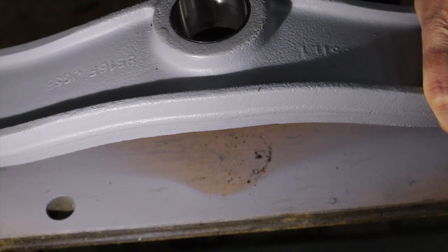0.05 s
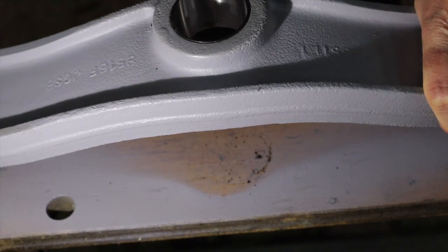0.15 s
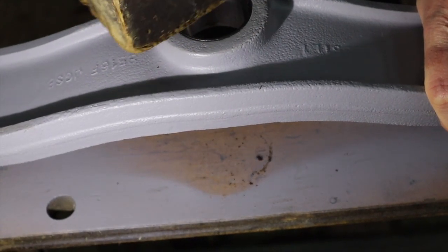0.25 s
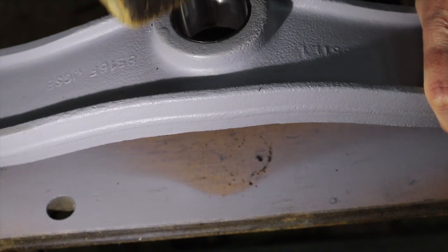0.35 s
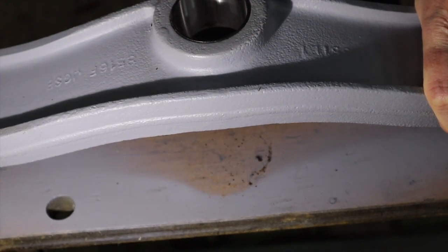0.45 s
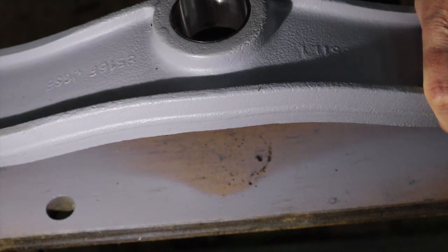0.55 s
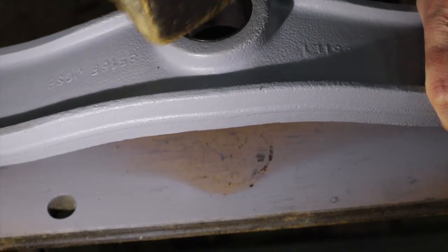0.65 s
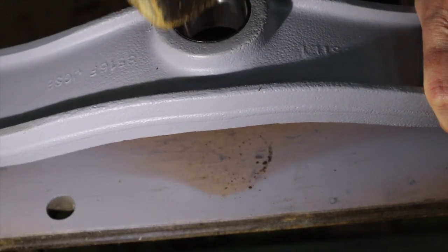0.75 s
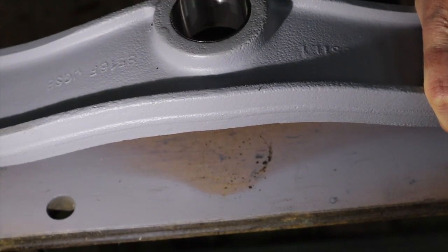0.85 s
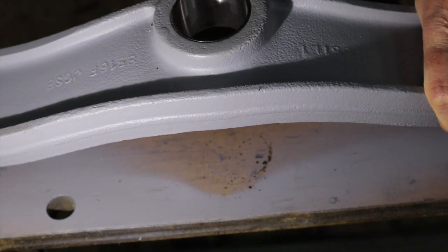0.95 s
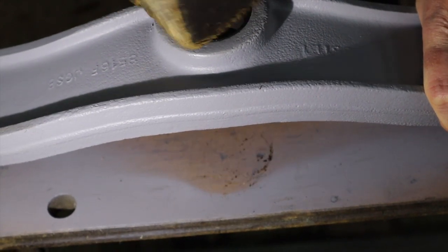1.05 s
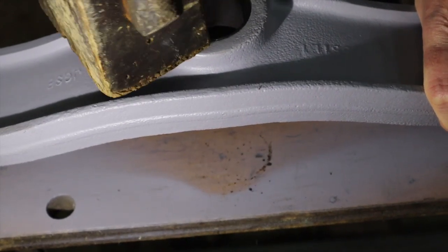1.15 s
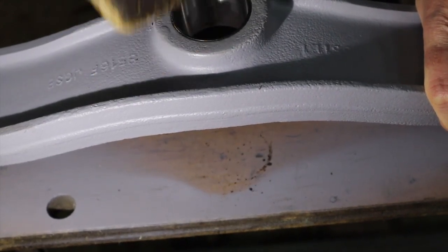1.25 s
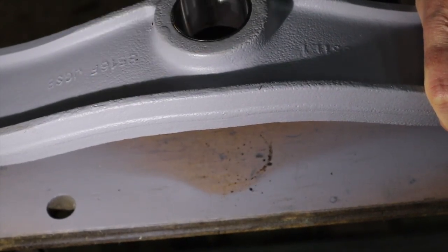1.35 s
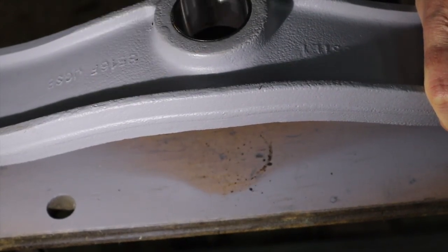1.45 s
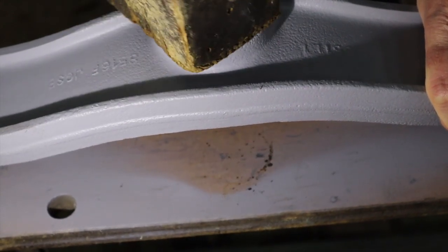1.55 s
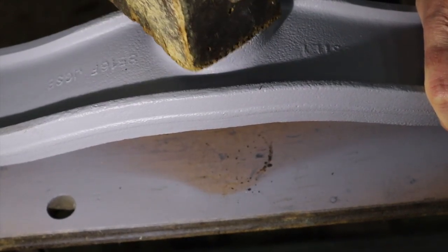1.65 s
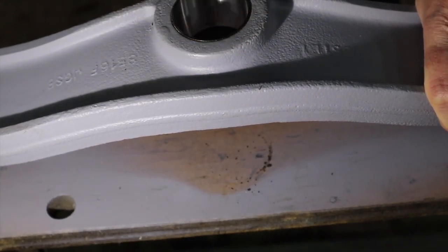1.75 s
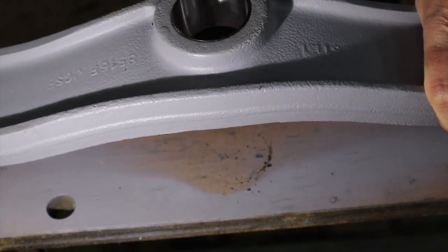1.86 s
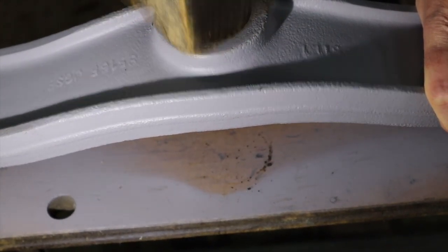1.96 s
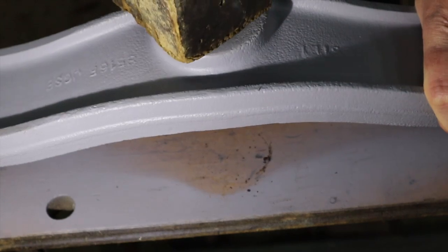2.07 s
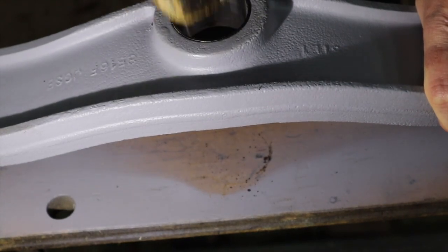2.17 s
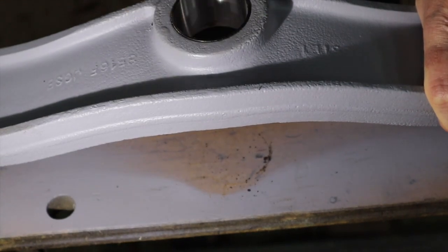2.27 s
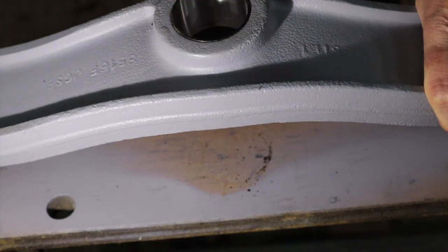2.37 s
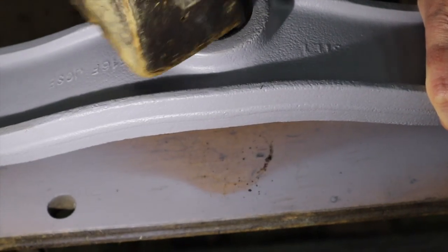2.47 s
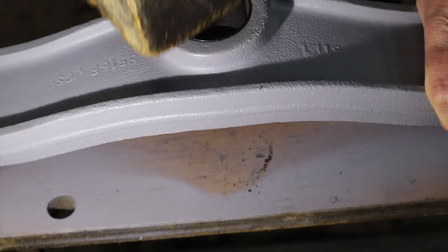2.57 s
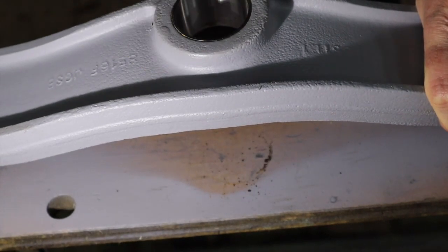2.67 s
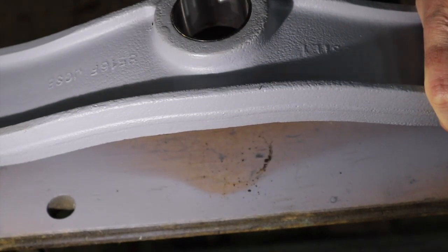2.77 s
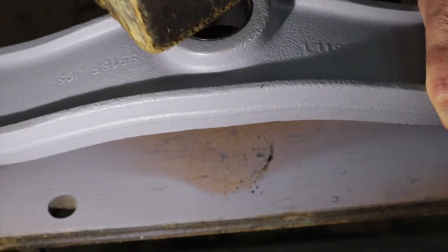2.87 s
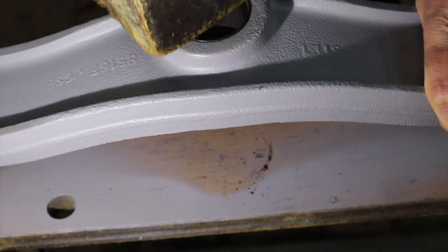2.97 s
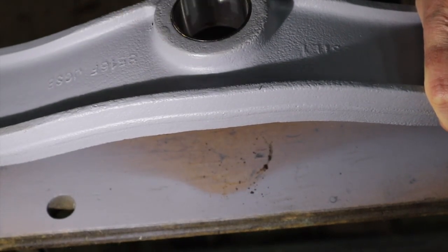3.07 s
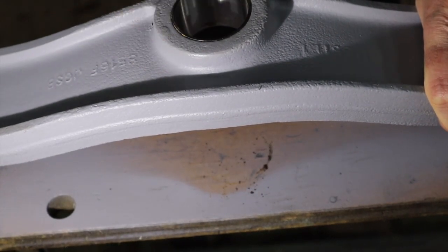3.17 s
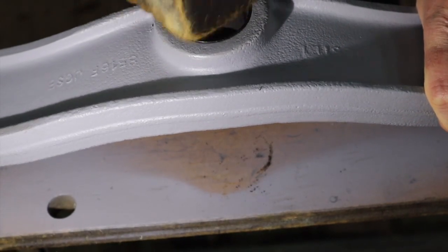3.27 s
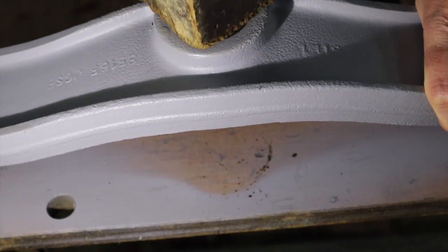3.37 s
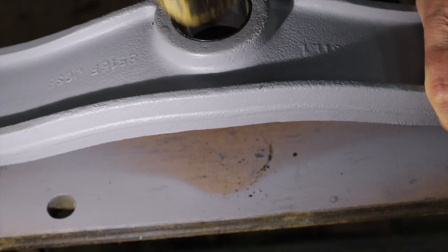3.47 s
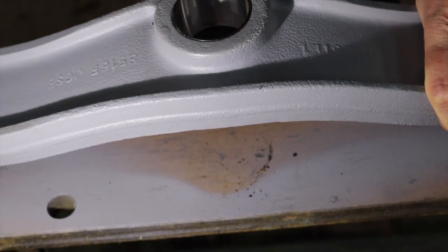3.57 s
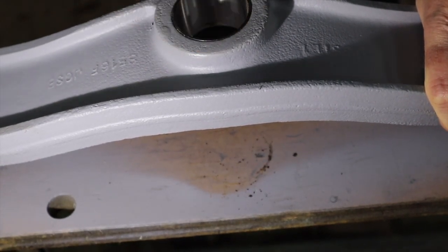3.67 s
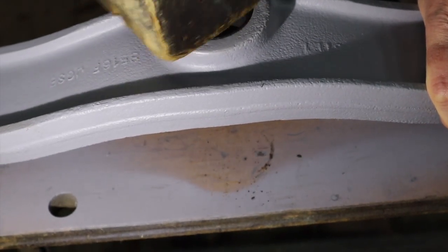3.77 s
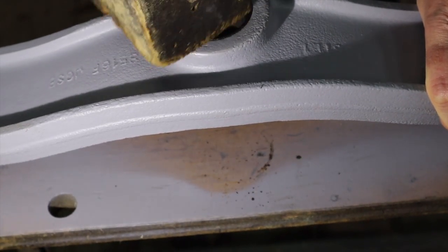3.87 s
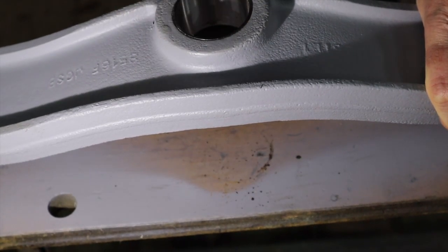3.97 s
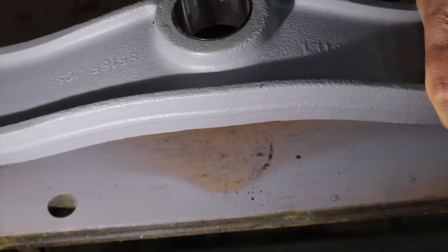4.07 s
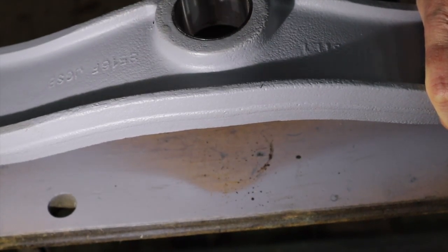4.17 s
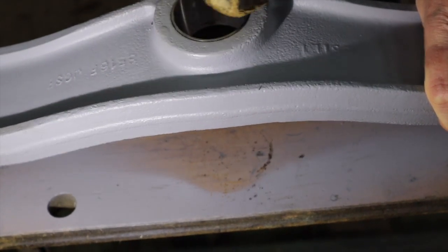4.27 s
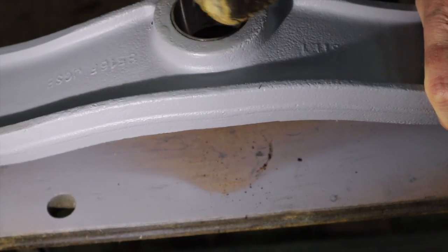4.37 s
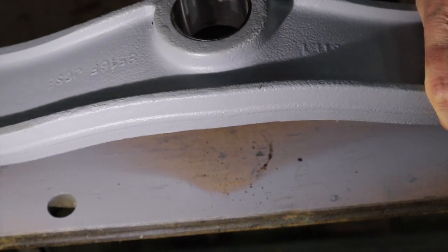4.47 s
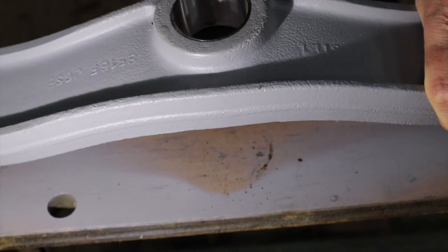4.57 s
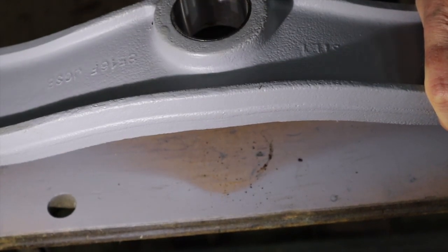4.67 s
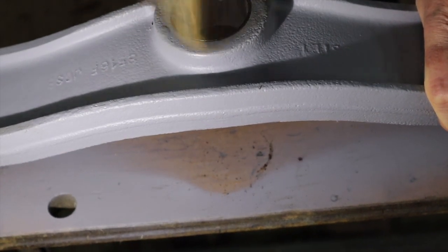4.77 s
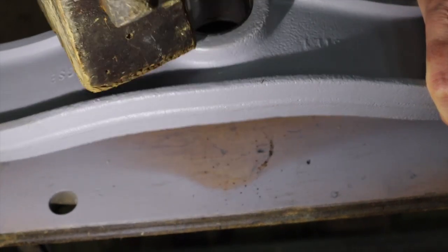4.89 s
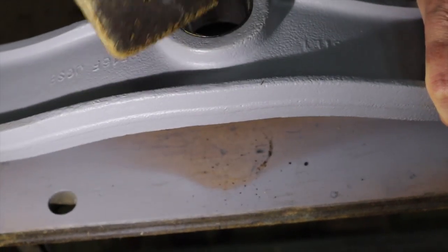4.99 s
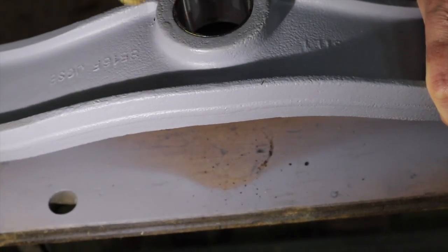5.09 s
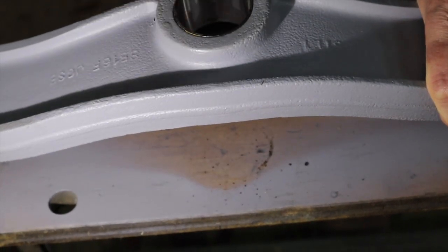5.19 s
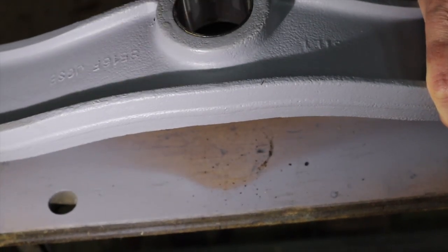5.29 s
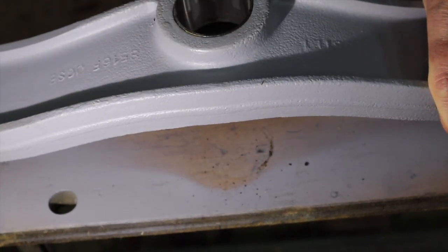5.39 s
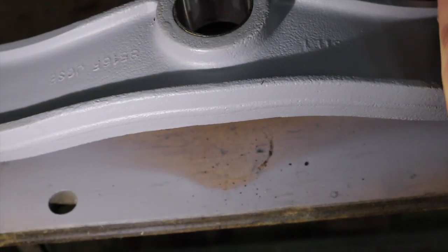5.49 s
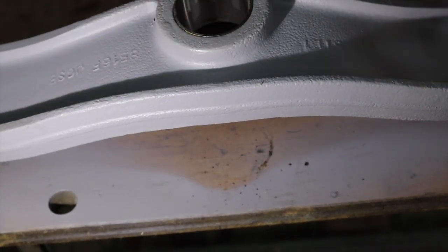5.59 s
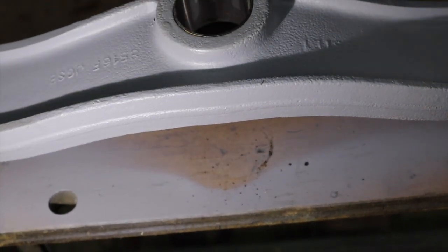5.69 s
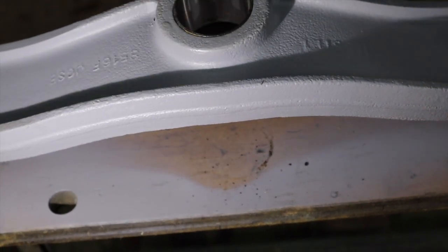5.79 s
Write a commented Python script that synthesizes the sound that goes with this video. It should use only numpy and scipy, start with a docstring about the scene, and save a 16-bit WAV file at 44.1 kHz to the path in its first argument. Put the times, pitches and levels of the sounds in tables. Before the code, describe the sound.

A hammer taps a steel bush into a cast metal beam, eleven blows at about two a second. Each lands with a sharp crack, a slight thump from the bench and a bright metallic ring that changes in colour from hit to hit. The last blow comes slightly late and harder, then rings away over a faint low rumble. The microphone is close and slightly overloaded, with a short workshop echo.

```python
"""Sharp, ringing blows, about two a second: a hammer taps a steel bush into a cast axle beam.
Each impact cracks, thumps the bench and excites the casting's modes, whose strengths depend on where
round the rim it lands; the workshop walls give back a short wash. Near the end the beam hops on the
bench and a faint rumble grows. The close microphone overloads lopsidedly, and a gain control ducks
after each blow."""
import sys
import numpy as np
from scipy import signal
from scipy.io import wavfile
from scipy.ndimage import minimum_filter1d

SR = 44100
rng = np.random.default_rng(int(sys.argv[2]) if len(sys.argv) > 2 else 0)


def store_wav(level_fs):
    """Save 16-bit WAV to argv[1]."""
    pcm = np.round(np.clip(np.atleast_2d(level_fs), -1, 1) * 32767)
    wavfile.write(sys.argv[1], SR, pcm.T.astype(np.int16))


N = 257544

# Hammer blows round the rim of the bush; levels in all tables are relative:
# (time [s], ring force [dB], spot on the rim [degrees], crack and wash level [dB], thump level [dB])
BLOWS = [(-0.195, -3.5, 351, -1.5, 0), (0.2371, -.5, 357, 0, -0.5), (0.6637, 1, 333.4, 2, 0.5),
         (1.0924, 1, 388, 1, 3), (1.5460, 1, 250.5, 4.5, 2.5), (2.0032, -2.5, 216, 2.5, -7),
         (2.4503, 0.5, 427, -0.5, 2.5), (2.8747, 0, 391.4, 0.5, -3), (3.3145, -2, 278, 1.5, -8.5),
         (3.7593, 0, 421, 1.5, 0), (4.2505, -0.5, 134.3, 4.5, -12.5), (4.8237, 5, 430.6, 6.5, 2)]
# Modes of the bench: (frequency [Hz], level [dB], t60 [s])
BENCH_MODES = [(141, -9.5, 0.055), (198.6, -9.5, 0.082), (410, -13.5, 0.11)]
# The beam lands on the bench after a hop: (time [s], level [dB])
LANDINGS = [(4.869, 1)]
# Modes of the casting; close pairs beat: (frequency [Hz], level [dB], t60 [s])
CASTING_MODES = [(609, -26, .35), (631, -27, .48), (1633, -32, .6), (1035, -21, .3), (1038.5, -23, .5),
                 (1331.6, -16, .86), (1332, -37, 2.2), (1539.5, -5, .5), (1543, -32, .9), (1957, -15, .42),
                 (2148.6, -8, .6), (2148.6, -40, 1.15), (2350, -25, .5), (2372, -6, .09), (2376, -14, .55),
                 (2763, -28, .52), (2852, -11, .48), (2964, -27, .7), (2988.8, -34, 1.2),
                 (2988.8, -7.5, .68), (3250, -13, .6), (3244, -30, .58), (3502, -25, .4), (3507, -21, .55),
                 (3690, -24, .16), (4317, -33, .47), (4581, -34, .3), (4468, -28, .55), (4780, -46, .9),
                 (4864, -26, .38), (5173, -36, .42), (6191, -33, .38), (6214, -35, .43), (6429, -37, .36),
                 (7012, -37, .38), (7155, -45, .39), (7955, -47, .42), (9052, -46, .45), (9226, -48, .33),
                 (10240, -45, .4), (12613, -60, .32), (13592, -62, .32)]
# Main rings of the casting, each made of the modes within 1% of it: (frequency [Hz])
MAIN_RINGS_HZ = [1037, 1331, 1540, 1957, 2148, 2362, 2851, 2976, 3249, 3506, 4468, 4780, 4864, 6200, 6429,
                 7012, 9052, 9226, 10240]
# Response of each main ring round the rim: (level [dB], swing [0-1], loudest spot [degrees])
RING_SHAPES = [(0, 0.9, 107), (-2, 0.99, 357.6), (1, 0.1, 176), (-4.5, 1, 374), (2.5, .91, 129.3),
               (2.5, .42, 347), (3.5, 0.5, 206), (5, 0.79, 201), (0, 0.8, 379), (4, 0.7, 130),
               (-0.5, 0.9, 212), (0.5, .3, 81), (2, .5, 300), (-1.5, 0, 310), (-1, 1, 280), (0.5, 0.2, 140),
               (-0.5, 0.6, 180), (3, .6, 180), (-7.5, 0.9, 365)]
# Spectrum of the wash: (frequency [Hz], spectral density level [dB])
WASH_SPECTRUM = [(60, -21), (150, -10), (400, -8.5), (1000, 3.5), (2500, -2), (5000, -10), (9000, -24.5),
                 (16000, -26)]
# Decay of the wash: (frequency [Hz], t60 [s])
WASH_DECAY = [(60, 0.35), (300, 0.49), (1000, 0.49), (3000, 0.62), (7000, 0.14), (15000, 0.18)]
# The rumble grows as the work ends: (time [s], level [dB])
RUMBLE_LEVELS = [(0, -90), (4.199, -92), (4.4, -59.5), (4.8, -68), (5.001, -52), (5.84, -59)]

CRACK_DB, CRACK_RISE_S, CRACK_T60_S, CRACK_HZ = 3.5, 0.00017, 0.099, 3250
SAG, SAG_S = .002, .1   # ringing starts flat by this share of its pitch, then settles
# Some rings hold while the beam is off the bench and are choked when it settles.
CHOKED_HZ, CHOKE_AFTER_S, CHOKE_WIDTH_S, CHOKE_DB = [1539.5, 2376, 3250], .109, .007, -19
SPREAD_DB = 3   # scatter of the other modes from blow to blow
WASH_DB, WASH_RISE_S = -12, 0.0026
ECHO_DB, ECHO_T60_S = -12.5, .42
DIP_DB, DIP_AFTER_S, DIP_WIDTH_S = -3.5, 0.051, 0.038
RUMBLE_HZ, MURMUR_DB, MURMUR_HZ, HISS_DB = 32, -82, 300, -105
SQUARE_LAW, CUBE_LAW, CEILING_UP, CEILING_DOWN = 0.4, 0.093, .8, 1.65   # microphone overload
HOLD_S, RELEASE_DB_PER_S = 0.015, 80
COUPLING_HZ, CLIP, STOPBAND_HZ = 45, .93, 16900


def from_db(db):
    """Amplitude ratio of a level in decibels."""
    return 10 ** (np.asarray(db) / 20)


def at_hz(table, hz):
    """Linear interpolation on a logarithmic frequency axis."""
    frequencies, values = np.transpose(table)
    return np.interp(np.log(hz), np.log(frequencies), values)


def decay(age, t60):
    """Exponential damping: the amplitude falls 60 dB in t60 seconds."""
    return np.exp(-np.log(1000) * age / t60)


def butter(x, hz, kind):
    """Maximally flat filtering from a second-order Butterworth prototype."""
    return signal.sosfilt(signal.butter(2, hz, kind, fs=SR, output="sos"), x)


def since_blow():
    """Each impact is a new time origin: the latest blow's index and its age [s] at every sample."""
    starts, now = np.array(BLOWS)[:, 0], np.arange(N) / SR
    latest = np.searchsorted(starts, now, side="right") - 1
    return latest, now - starts[latest]


def hammer_crack(age):
    """Impact noise: the brief contact of steel on steel radiates a broadband burst."""
    envelope = (1 - np.exp(-age / CRACK_RISE_S)) * decay(age, CRACK_T60_S)
    return from_db(CRACK_DB) * envelope * butter(rng.standard_normal(N), CRACK_HZ, "low")


def free_vibration(modes, strength_db, latest, age):
    """Superposition of damped modes: each contact stops the old ring and starts anew, inward first."""
    sagged_age = age - SAG * SAG_S * (1 - np.exp(-age / SAG_S))
    choke_db = CHOKE_DB * (.5 + .5 * np.tanh((age - CHOKE_AFTER_S) / CHOKE_WIDTH_S))
    out = np.zeros(N)
    for (hz, level_db, t60), blow_db in zip(modes, strength_db):
        gain = from_db(level_db + blow_db[latest] + choke_db * (hz in CHOKED_HZ))
        out -= gain * decay(age, t60) * np.sin(2 * np.pi * hz * sagged_age)
    return out


def bench_thump(latest, age):
    """Impulse response of the bench: blows and the beam's landing excite low, heavily damped modes."""
    thump_db = np.array(BLOWS)[:, 4]
    out = free_vibration(BENCH_MODES, [thump_db] * len(BENCH_MODES), latest, age)
    for start, landing_db in LANDINGS:
        landing_age = np.maximum(np.arange(N) / SR - start, 0)
        out += free_vibration(BENCH_MODES, [[landing_db]] * len(BENCH_MODES), 0, landing_age)
    return out


def casting_ring(latest, age):
    """Modal excitation: main rings follow the force and spot of a blow; other modes vary by chance."""
    strength_db = SPREAD_DB * rng.normal(0, 1, (len(BLOWS), len(CASTING_MODES))).T
    _, force_db, spot = np.array(BLOWS)[:, :3].T
    mode_hz = np.array(CASTING_MODES)[:, 0]
    for ring_hz, (level_db, swing, loudest_spot) in zip(MAIN_RINGS_HZ, RING_SHAPES):
        in_ring = np.abs(mode_hz / ring_hz - 1) < .01
        shape = 1 + swing * np.cos(np.radians(spot - loudest_spot))
        shape_db = 10 * np.log10(shape ** 2 + .003)   # a blow on a node still rings faintly
        strength_db[in_ring] = force_db + level_db + shape_db
    return free_vibration(CASTING_MODES, strength_db, latest, age)


def diffuse_wash(age):
    """Modal overlap: reflections and many weak modes merge into noise, each band dying at its own rate."""
    white = rng.standard_normal((2, N))   # neighbouring bands take independent noise
    edges = 50 * 2 ** np.arange(0, 8.5, 1 / 3)   # third octaves [Hz]
    wash = np.zeros(N)
    for k, (low, high) in enumerate(zip(edges, edges[1:])):
        centre_hz = np.sqrt(low * high)
        band = butter(white[k % 2], [low, high], "band")
        wash += from_db(at_hz(WASH_SPECTRUM, centre_hz)) * decay(age, at_hz(WASH_DECAY, centre_hz)) * band
    return from_db(WASH_DB) * (1 - np.exp(-age / WASH_RISE_S)) * wash


def wall_echo(x):
    """Reverberation: convolution with decaying noise stands for dense reflections from the walls."""
    response = rng.standard_normal(SR // 2) * decay(np.arange(SR // 2) / SR, ECHO_T60_S)
    response /= np.sqrt(np.sum(response ** 2))
    return from_db(ECHO_DB) * signal.fftconvolve(x, response)[:N]


def level_dip(latest, age):
    """Amplitude modulation: the level dips briefly after blows near 0 degrees on the rim."""
    spot = np.radians(np.array(BLOWS)[latest, 2])
    depth_db = DIP_DB * np.maximum(np.cos(spot), 0) ** 2
    bell_curve = np.exp(-.5 * ((age - DIP_AFTER_S) / DIP_WIDTH_S) ** 2)
    return from_db(depth_db * bell_curve)


def workshop_noise():
    """Ambient noise: low-pass filtering gives a deep rumble and a room murmur, with a trace of hiss."""
    rumble, murmur, hiss = rng.standard_normal((3, N))
    for _ in range(3):
        rumble = butter(rumble, RUMBLE_HZ, "low")
    murmur = butter(murmur, MURMUR_HZ, "low")
    rumble_db = np.interp(np.arange(N) / SR, *np.transpose(RUMBLE_LEVELS))
    return (from_db(rumble_db) * rumble / rumble.std() + from_db(MURMUR_DB) * murmur / murmur.std()
            + from_db(HISS_DB) * hiss)


def overload(x):
    """Asymmetric distortion: inward swings grow, outward ones shrink, and each meets a soft ceiling."""
    turning_point = (np.sqrt(SQUARE_LAW ** 2 + 3 * CUBE_LAW) - SQUARE_LAW) / (3 * CUBE_LAW)
    held = np.clip(x, -1.5, turning_point)   # keeps the curve from folding back
    bent = held - SQUARE_LAW * held ** 2 - CUBE_LAW * held ** 3
    ceiling = np.where(bent > 0, CEILING_UP, CEILING_DOWN)
    return bent / (1 + (bent / ceiling) ** 8) ** (1 / 8)


def duck(x, threshold_db, share, attack_s):
    """Compression: the gain falls by a share of the amount by which recent peaks pass the threshold."""
    hold = 2 * int(HOLD_S * SR / 2) + 1
    peak = -minimum_filter1d(-np.abs(x), size=hold, origin=hold // 2, mode="constant")
    release_ramp = RELEASE_DB_PER_S * np.arange(N) / SR
    peak_db = np.maximum.accumulate(20 * np.log10(peak + 1e-9) + release_ramp, axis=1) - release_ramp
    cut_db = share * np.maximum(peak_db - threshold_db, 0)
    pole = np.exp(-1 / (attack_s * SR))
    smooth_cut_db = signal.lfilter([1 - pole], [1, -pole], cut_db)
    return x * from_db(-smooth_cut_db)


def scene():
    """Superposition: the blows, their reflections and the room's noise add at the microphone."""
    latest, age = since_blow()
    ring = casting_ring(latest, age)
    blows = ring + wall_echo(ring) + bench_thump(latest, age)
    noise_gain = from_db(np.array(BLOWS)[latest, 3])
    blows += noise_gain * (diffuse_wash(age) + hammer_crack(age))
    return (level_dip(latest, age) * blows + workshop_noise())[None]


def record(dry):
    """A nonlinear signal chain: overload, coupling capacitor, gain control, clipping, steep top cut."""
    x = butter(overload(dry), COUPLING_HZ, "high")
    x = duck(x, threshold_db=-35.5, share=0.23, attack_s=1.3)   # follows the average loudness
    x = duck(x, threshold_db=-5.5, share=0.44, attack_s=0.0073)   # follows each blow
    top_cut = signal.cheby2(16, 90, STOPBAND_HZ, fs=SR, output="sos")
    return signal.sosfilt(top_cut, np.clip(x, -CLIP, CLIP))


dry = scene()
out = record(dry)
store_wav(out)
```